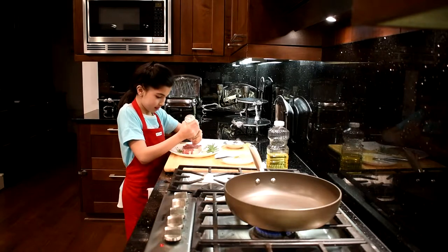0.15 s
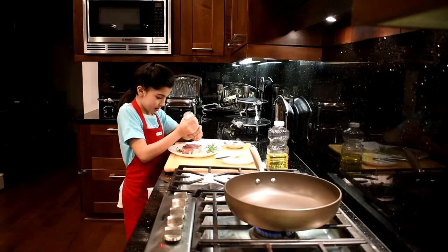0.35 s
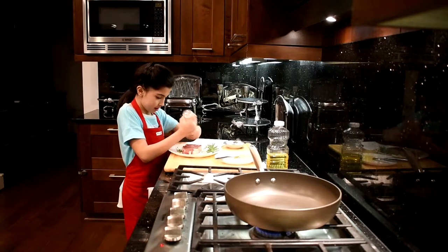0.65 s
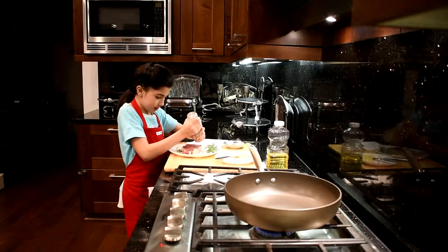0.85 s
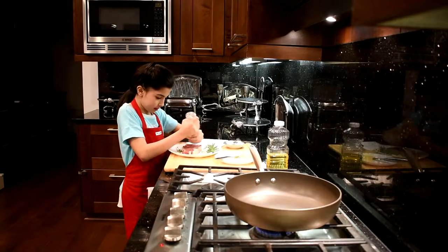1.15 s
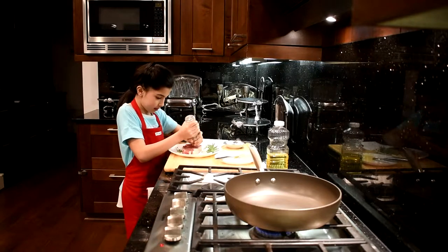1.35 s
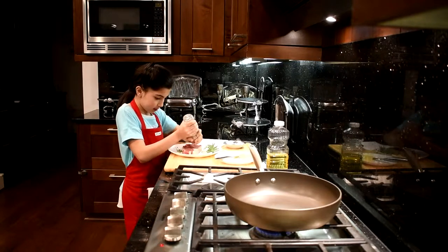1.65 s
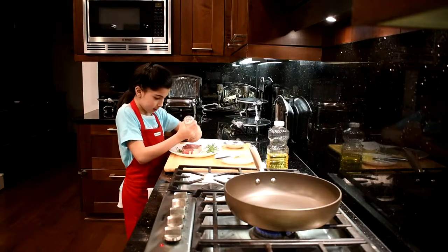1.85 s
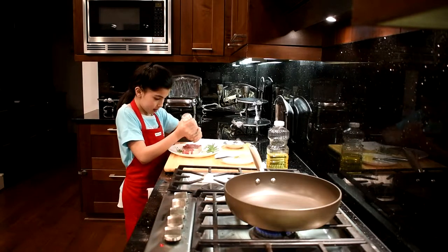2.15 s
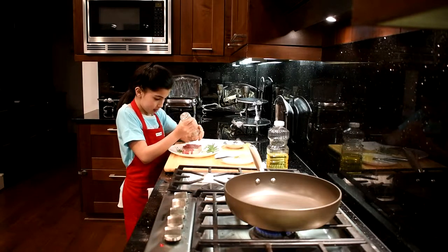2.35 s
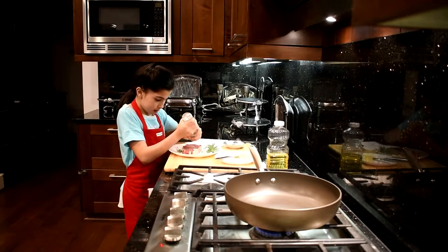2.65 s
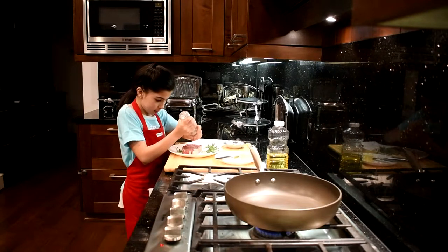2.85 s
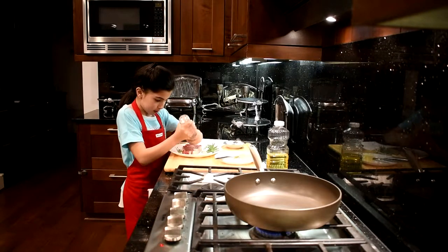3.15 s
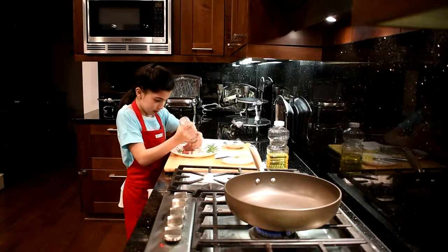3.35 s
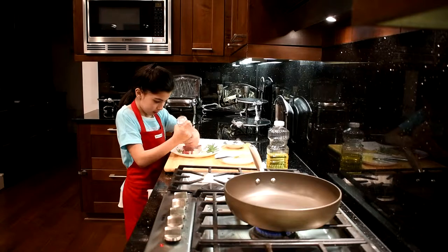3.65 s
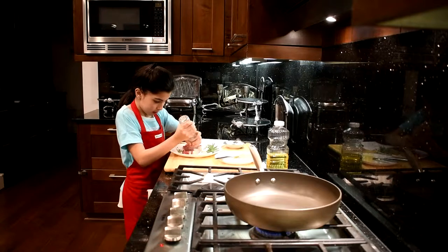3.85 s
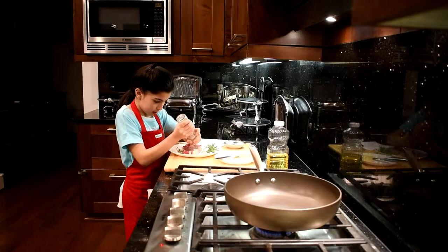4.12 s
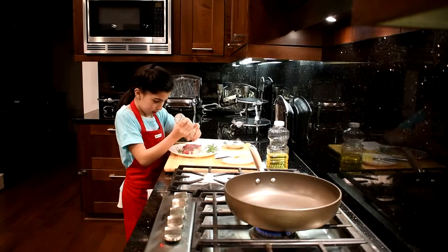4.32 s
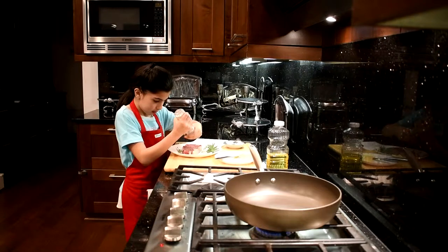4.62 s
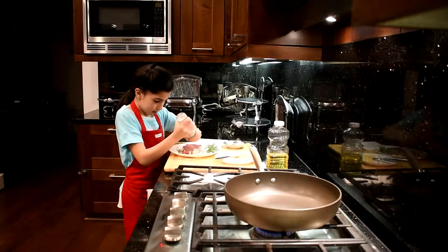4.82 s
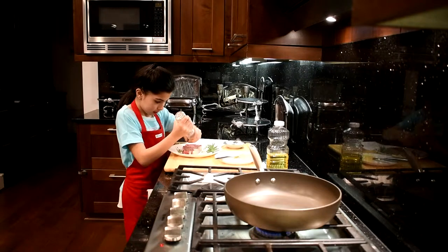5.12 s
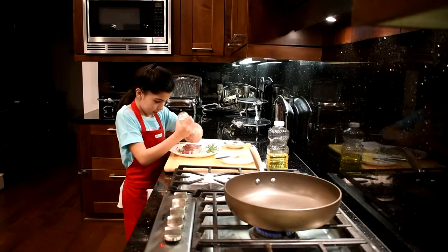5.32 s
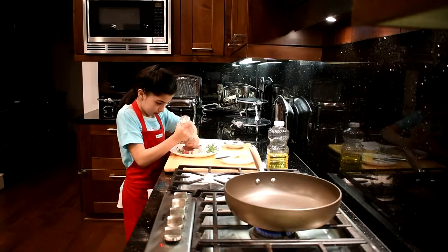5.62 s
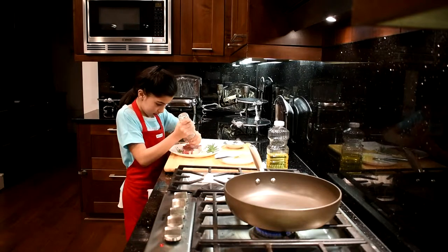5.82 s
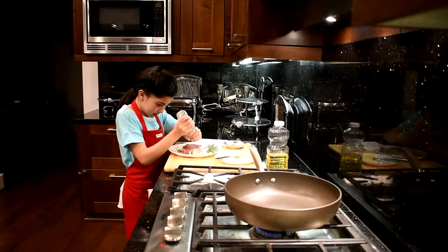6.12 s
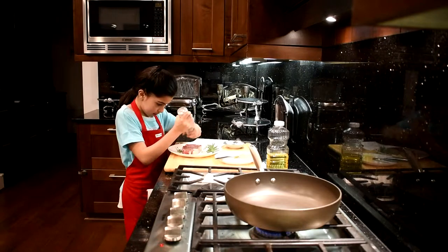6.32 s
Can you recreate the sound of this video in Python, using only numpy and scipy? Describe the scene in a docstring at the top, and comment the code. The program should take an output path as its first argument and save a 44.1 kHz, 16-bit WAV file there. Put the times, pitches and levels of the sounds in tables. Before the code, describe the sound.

In a hard-surfaced home kitchen, a salt mill crunches close to the microphone, very slightly right of centre. Dry, treble-heavy snaps of breaking crystals stand out over short rasping scrapes, brief powdery hisses and little plastic-like cap bumps. Irregular twists alternate with near-quiet gaps where a soft gas-burner rush and faint hum remain. The loudest cracks clip with a small low thump, and echoes fade around.

```python
"""A hand mill grinds coarse salt over a plate in a hard-walled kitchen: each scrape is fine random grain noise
through the grit, cap and body resonances, and crystals crack in short noise strikes, some with a run of pieces.
The cap knocks and powder puffs hiss; echoes and a decaying noise tail form the room.
Behind lie a burner-like noise rush and a faint hum; the overloaded stereo recorder adds low thumps, clips loud
peaks and cuts the top."""
import sys
import numpy as np
from scipy import signal
from scipy.fft import rfft, irfft
from scipy.io import wavfile

SR = 44100
rng = np.random.default_rng(int(sys.argv[2]) if len(sys.argv) > 2 else 0)


def persist_wave(psi):
    """Save psi, clipped to +-1, as 16-bit WAV."""
    counts = np.round(np.clip(psi, -1, 1) * 32767).astype(np.int16)
    wavfile.write(sys.argv[1], SR, np.atleast_2d(counts).T)


N = 285768
TIME_S = np.arange(N) / SR

# Kitchen air noise. Each row: frequency in Hz, relative density in dB per Hz.
AIR_SPECTRUM = [(15, -40), (25, -17), (92, -1), (200, -6), (335, 4.5), (427, -11), (476, -4.5),
                (2110, -16.5), (2990, -16), (3620, -18), (7310, -16), (9070, -39.5), (10400, -21.5),
                (14800, -20.5), (16000, -36)]
# Left-right likeness of the air noise. Each row: frequency in Hz, correlation from -1 to 1.
AIR_CORRELATION = [(40, 0.67), (80, 0.879), (140, -0.0235), (300, -0.66484), (600, -0.46), (2000, -0.6911),
                   (12000, -0.056)]
# Appliance hum. Each row: frequency in Hz, rms level in dB.
HUM_TONES = [(84, -83), (107.7, -72), (339, -70.5)]
# Room decay. Each row: frequency in Hz, time to fall 60 dB in seconds.
ROOM_T60 = [(300, .5), (1300, 1.3253), (3000, 1.0), (6000, 0.9791), (9000, 0.5), (15000, 0.631)]
# Room tail. Each row: frequency in Hz, level in dB re the direct sound, before scatter is added.
ROOM_LEVELS = [(300, -1), (1300, -3.5), (3000, -3.5), (6000, -7), (9000, -7), (15000, -12.5)]
# First echoes from counter and tiles. Each row: delay in seconds, level in dB re the direct sound.
FIRST_ECHOES = [(.0069, -25), (0.0107, -9.5)]

# Resonances. Each row: frequency in Hz, width in Hz, relative level in dB.
BURR_RESONANCES = [(4938.3, 1554.3, -6.5), (7014.5, 998.2, 2.5), (7793.8, 417, 6.5), (9076.1, 1190.3, 2.5)]
SPLINTER_RESONANCES = [(10440, 3200, 5.5), (13828, 1100, 1), (15930, 1000, -0.5)]
BODY_RESONANCES = [(318.19, 33.59, -1.5), (543.31, 119.35, -11), (694, 1000, -21.5)]  # hollow body of the mill, columns as above
GRIT_RESONANCES = [(4359, 910, -14), (5829.4, 676, -3.5), (6398, 1218.3, -3), (8254.5, 1240.7, 0.5),
                   (9247, 1013.8, 2.5), (11928, 5400, -13), (15000, 2900, -14.5)]
JAR_RESONANCES = [(1306.6, 204.87, -2.5), (1870.1, 301.88, 1.5), (2425.2, 650.3, 1), (3075, 350.2, 6),
                  (3978.1, 736.2, -1)]
CAP_RESONANCES = [(967.25, 64, -5), (1310, 217.1, 7.5), (1959.1, 470, -7), (2660.4, 560, -4),
                  (3054.6, 856.8, 6.5), (3909.5, 830, -8), (4953, 530, -1)]
# Least damped region under the hands. Each row: time in seconds, frequency in Hz.
FREE_REGION = [(.3, 3978), (.62, 2868), (1.05, 1379), (1.48, 2332), (2.55, 2494), (2.68, 2906),
               (2.82, 1900), (3.5, 3111), (4.24, 2473), (4.78, 2280), (5.86, 2450), (6.23, 2247)]

# Powder puffs. Each row: centre in seconds, Gaussian sigma in seconds, level in dB before level_db.
POWDER_PUFFS = [(0.804, 0.04095, -52), (1.117, 0.02184, -55.5), (1.192, 0.01915, -48.5),
                (3.144, 0.02568, -48.5)]
# Low thumps of the overloaded recorder under the loudest cracks.
# Each row: start in seconds, peak level in dB before the high-pass.
OVERLOAD_THUMPS = [(2.547, -34), (2.831, -27), (4.7513, -26.5), (4.778, -37), (5.862, -28.5)]
# Cap bumping the jar. Each row: start in seconds, cap level in dB, hollow body level in dB.
CAP_KNOCKS = [(0.6165, -29.5, -36), (.626, -46, -35.5), (1.0518, -35, -41.5), (1.479, -46.5, -48),
              (2.025, -47, -54.5), (2.232, -42.5, -52.5), (2.447, -47, -48.5), (3.145, -56, -46.5),
              (3.508, -36, -46), (3.619, -43.5, -37.5), (4.2, -43, -58.5), (4.243, -40.5, -44),
              (4.978, -41, -52.5), (5.6996, -42, -49.5), (6.226, -29.5, -48.5)]
# Burrs biting into grit. Each row: start in seconds, time to release in seconds,
# grit level in dB before grit_db, cap rasp in dB re grit before rasp_db.
GRIT_SCRAPES = [(0.208, 0.0212, -49.5, -9), (.576, .056, -29.5, -9), (0.689, 0.09998, -32, -11.5),
                (0.979, 0.0588, -38, -9), (1.078, 0.0566, -42.5, -18.5), (1.141, 0.06511, -39.5, -7),
                (1.408, 0.01645, -50, -3), (1.759, 0.1115, -52.5, -21), (2.004, 0.1156, -50.5, -20),
                (2.451, 0.03498, -47.5, -13.5), (2.501, 0.01976, -43.5, -5), (3.082, 0.09144, -33.5, -12),
                (3.24, 0.03173, -37, -11), (3.363, 0.02549, -44.5, -8), (3.563, 0.06734, -34, -11),
                (3.72, 0.08569, -36.5, -9), (4.195, .055, -59, 3.5), (4.382, 0.0405, -58, -21),
                (5.319, 0.14817, -52, -4.5), (5.511, 0.020423, -42.5, -4.5), (6.189, 0.025833, -27, -16),
                (6.216, 0.024521, -19.5, -27)]
# Crystals cracking. Each row: start in seconds, snap level in dB, jar ringing in dB re snap, splinters in
# dB re snap (each before its own offset in cracks), time for the pieces to lose PIECE_FADE_DB in seconds (0: none).
CRYSTAL_CRACKS = [(.056, -41.5, -5, -18, 0), (.141, -39, -5.5, -13, 0.001206), (.279, -12, -6, -6, 0),
                  (0.2851, -13, -13.5, -19.5, 0.000028), (0.3069, -22, -3, -15.5, 0.00216),
                  (.551, -37, -7, -6.5, 0), (0.5788, -33.5, -3, -13.5, 0.002092),
                  (1.317, -39.5, -5, -15.5, 0), (1.4797, -34.5, -4, -19, 0.00962),
                  (1.726, -41.5, -5, -9, 0.000746), (2.006, -43, -8, -15, 0.000567),
                  (2.2324, -35.5, -16.5, -16.5, 0), (2.447, -35.5, -19, -1, 0.003941),
                  (2.548, -5, -12.5, -9.5, 0.010947), (2.5816, -13, -20, -20, 0.000035),
                  (2.61, -12.5, -16, -4, 0.000479), (2.6667, -14, -15, -12, 0.021),
                  (2.825, -24, -7.5, -12.5, 0.000209), (2.8306, -8, -13.5, -27.5, 0.0061),
                  (3.08, -34, -7.5, -13, 0.00312), (3.1456, -29.5, -12.5, -7.5, 0.000016),
                  (3.508, -38, -20.5, -10.5, 0), (3.9111, -21, -16, -20.5, 0),
                  (3.9706, -37, -9.5, -11.5, 0), (4.021, -22, -13.5, -7, 0.00005),
                  (4.2441, -37, -7, -4.5, 0), (4.3196, -43.5, -12, -14.5, 0),
                  (4.678, -44.5, -10.5, -19.5, 0.00037), (4.7516, -6, -19.5, -9.5, 0.00779),
                  (4.7785, -4.5, -16, -12, .026), (4.8021, -8, -17, -8, 0),
                  (5.3265, -39.5, -10.5, -22.5, 0.000718), (5.4431, -40.5, -9, -16, 0.000299),
                  (5.475, -38, -9, -17.5, 0.001378), (5.5594, -15.5, -14, -11, 0),
                  (5.7101, -37, -6.5, -7, 0.000023), (5.7694, -29, -13.5, -10, 0.00023),
                  (5.8541, -5, -10, -5, .028), (5.9052, -7, -21, -9, .007), (6.213, -15.5, -14, -2, 0),
                  (6.2254, -12.5, -22, 2, 0.01379)]

AIR_DB, CUTOFF_HZ = -52, 15750
BITE_S, SAG_DB_PER_S, RELEASE_S = 0.01391, 22.5, 0.02403
BODY_RE_RASP_DB = -6.5
PIECE_GAP_S, PIECE_GAP_LOG_SPREAD = .006, .12
PIECE_RE_SNAP_DB, PIECE_FADE_DB = -4, 8.5


def from_db(db):
    """Decibels to gain."""
    return 10 ** (np.asarray(db) / 20)


def rms_one(x):
    """Scale to unit rms."""
    return x / np.sqrt(np.mean(x ** 2) + 1e-20)


def at_hz(points, hz):
    """Read a table on a log-frequency axis."""
    table_hz, values = np.array(points).T[:2]
    return np.interp(np.log(hz), np.log(table_hz), values)


def add(track, start_s, sound):
    """Mix a sound in at a given time."""
    at = round(start_s * SR)
    track[:, at:at + sound.shape[-1]] += sound[..., :N - at]


def pair(mid, side, correlation):
    """Left and right with a given correlation."""
    correlation = np.clip(correlation, -1, 1)
    common = np.sqrt((1 + correlation) / 2) * mid
    return common + np.sqrt((1 - correlation) / 2) * np.array([side, -side])


def resonate(x, modes):
    """Parallel two-pole resonances with alternating signs."""
    out = 0
    for k, (hz, width_hz, db) in enumerate(modes):
        radius = np.exp(-np.pi * width_hz / SR)
        gain = (-1) ** k * from_db(db) * (1 - radius ** 2) / 2
        poles = [1, -2 * radius * np.cos(2 * np.pi * hz / SR), radius ** 2]
        out = out + signal.lfilter([gain, 0, -gain], poles, x + 1e-18)
    return out


def noise_bands(size):
    """Half-octave bands of two-channel noise, as (centre Hz, band)."""
    edges_hz = np.geomspace(22, 17500, 21)
    white = rng.standard_normal((2, 2, size))
    for k, (low, high) in enumerate(zip(edges_hz, edges_hz[1:])):
        bandpass = signal.butter(2, [low, high], "band", fs=SR, output="sos")
        yield np.sqrt(low * high), signal.sosfilt(bandpass, white[k % 2])


def air_rush():
    """Steady rush of the burner and the room: noise bands weighted in level and stereo correlation."""
    rush = np.zeros((2, N))
    for hz, band in noise_bands(N):
        rush += from_db(at_hz(AIR_SPECTRUM, hz)) * pair(*band, at_hz(AIR_CORRELATION, hz))
    return from_db(AIR_DB) * rms_one(rush)


def appliance_hum():
    """Faint steady sines at random phases."""
    hum = np.zeros(N)
    for hz, db in HUM_TONES:
        hum += from_db(db) * np.sqrt(2) * np.sin(2 * np.pi * (hz * TIME_S + rng.random()))
    return hum


def kitchen(x, scatter_db, scatter_s, build_s, size=44100):
    """Two discrete echoes, quick scatter from things on the counter, then the long tail of the room."""
    age_s, response = np.arange(size) / SR, np.zeros((2, size))
    onset = 1 - np.exp(-(age_s / build_s) ** 2)
    scatter = from_db(scatter_db) * rms_one(onset * np.exp(-age_s / scatter_s))
    for hz, band in noise_bands(size):
        tail = rms_one(onset * from_db(-60 * age_s / at_hz(ROOM_T60, hz)))
        envelope = np.hypot(tail, scatter) / np.sqrt(size)
        response += band * from_db(at_hz(ROOM_LEVELS, hz)) * envelope
    for delay_s, db in FIRST_ECHOES:
        response[:, round(delay_s * SR)] += from_db(db)
    return signal.fftconvolve(x, response, axes=1)[:, :N]


def overload_thumps(rise_s, size=2048):
    """The overloaded recorder gives a low thump: one short high-passed pulse, the same in both channels."""
    out, age = np.zeros((2, N)), np.arange(size) / SR / rise_s
    for start_s, db in OVERLOAD_THUMPS:
        add(out, start_s, from_db(db) * age * np.exp(1 - age))
    highpass = signal.butter(2, 22, "high", fs=SR, output="sos")
    return signal.sosfilt(highpass, out + 1e-18)


def grains(per_s, spread_db, grain_s, correlation):
    """Small grains of uneven size give way at random, each in a tiny decaying noise burst."""
    sizes = from_db(spread_db * np.minimum(rng.exponential(1, N), 3.5))
    born = rng.random(N) < per_s / SR
    decay = np.exp(-1 / (grain_s * SR))
    energy = signal.lfilter([1], [1, -decay], born * sizes ** 2 + 1e-18)
    return np.sqrt(energy) * pair(*rng.standard_normal((2, N)), correlation)


def powder(level_db, grit_db):
    """Puffs of the finest salt stream from the burrs: dense grains through broad treble resonances."""
    flow = np.zeros(N)
    for centre_s, sigma_s, db in POWDER_PUFFS:
        flow += from_db(db + level_db) * np.exp(-((TIME_S - centre_s) / sigma_s) ** 2 / 2)
    dust = grains(per_s=3400, spread_db=6.5, grain_s=0.000594, correlation=0.1078)
    hiss = rms_one(resonate(dust, [(14303, 4530, 0)]))
    grit = rms_one(resonate(dust, [(6675, 3987, 0)]))
    return flow * (hiss + from_db(grit_db) * grit)


def gripped(modes, time_s, grip_db):
    """The hands damp the modes by grip_db per octave away from the free region."""
    free_hz = np.interp(time_s, *np.transpose(FREE_REGION))
    return [(hz, width_hz, db - grip_db * abs(np.log2(hz / free_hz))) for hz, width_hz, db in modes]


def burst(force):
    """Noise under a short force curve, evened over frequency and shaped by the force again."""
    spectrum = rfft(force * rng.standard_normal(force.shape))
    return force * irfft(spectrum / (np.abs(spectrum) + 1e-9))


def strike(force, parts, correlation):
    """One blow rings each (modes, dB) part; levels are rms referred to three milliseconds."""
    push = pair(burst(force), burst(force), correlation)
    share = np.sqrt(.003 * SR / len(force))
    return sum(from_db(db) * share * rms_one(resonate(push, modes)) for modes, db in parts)


def knocks(contact_s, grit_db, grip_db, size=4096):
    """The loose cap takes up its play and bumps the jar, pinching a little grit."""
    out, force = np.zeros((2, N)), np.exp(-np.arange(size) / SR / contact_s)
    for start_s, cap_db, body_db in CAP_KNOCKS:
        held_cap = gripped(CAP_RESONANCES, start_s, grip_db)
        parts = [(held_cap, cap_db), (BODY_RESONANCES, body_db), (GRIT_RESONANCES, cap_db + grit_db)]
        add(out, start_s, strike(force, parts, correlation=0.24))
    return out


def scrape(length_s, size=22050):
    """Pressure on the grit: quick rise, a sag as the grit wears down, and a release."""
    age_s = np.arange(size) / SR
    bite = np.minimum(age_s / BITE_S, 1)
    release = np.exp(-np.maximum(age_s - length_s, 0) / RELEASE_S)
    return bite * from_db(-SAG_DB_PER_S * age_s) * release


def grinding(grit_db, rasp_db):
    """Twisting crushes grit between the burrs; the cap rasps along and the hollow body murmurs."""
    levels = np.zeros((2, N))
    for start_s, length_s, db, cap_db in GRIT_SCRAPES:
        add(levels, start_s, from_db([[db], [db + cap_db]]) * scrape(length_s))
    grit, rasp = levels
    crush = grains(per_s=700, spread_db=2.8, grain_s=0.0006, correlation=0.1495)
    parts = [(grit, GRIT_RESONANCES, grit_db), (rasp, CAP_RESONANCES, rasp_db),
             (rasp, BODY_RESONANCES, rasp_db + BODY_RE_RASP_DB)]
    return sum(level * from_db(db) * rms_one(resonate(crush, modes)) for level, modes, db in parts)


def pieces(start_s, snap_db, run_s, count=5):
    """The first snap and any fading run of smaller, unevenly spaced ones, as (s, dB)."""
    snaps = [(start_s, snap_db)]
    gaps_s = PIECE_GAP_S * np.exp(PIECE_GAP_LOG_SPREAD * rng.standard_normal(count))
    if run_s > 0:
        for age_s in np.cumsum(gaps_s):
            fade_db = PIECE_FADE_DB * (age_s / run_s) ** 2
            snaps.append((start_s + age_s, snap_db + PIECE_RE_SNAP_DB - fade_db))
    return snaps


def cracks(fracture_s, crumble_s, crumble_db, shower_s, grip_db, snap_db, jar_db, splinter_db, body_db,
           size=1024):
    """A fracture takes a few milliseconds; pieces break in turn and fine splinters shower off."""
    out, age_s = np.zeros((2, N)), np.arange(size) / SR
    force = np.exp(-(age_s / fracture_s) ** 4) + from_db(crumble_db) * np.exp(-age_s / crumble_s)
    shower = np.exp(-age_s / shower_s)
    for start_s, first_db, jar, splinter, run_s in CRYSTAL_CRACKS:
        held_jar = gripped(JAR_RESONANCES, start_s, grip_db)
        for piece_s, db in pieces(start_s, first_db, run_s):
            parts = [(BURR_RESONANCES, db + snap_db), (held_jar, db + jar + jar_db),
                     (BODY_RESONANCES, db + body_db)]
            splinters = [(SPLINTER_RESONANCES, db + splinter + splinter_db)]
            add(out, piece_s, strike(force, parts, correlation=0.04))
            add(out, piece_s, strike(shower, splinters, correlation=0.12))
    return out


def scene():
    """The mill stands a little to the right; its reverberation comes from all round."""
    mill = powder(level_db=-1.0, grit_db=8.5)
    mill = mill + knocks(contact_s=0.0020925, grit_db=-4.5, grip_db=5)
    mill = mill + grinding(grit_db=-5.0, rasp_db=-5)
    mill = mill + cracks(fracture_s=0.0027248, crumble_s=0.0017, crumble_db=9.5, shower_s=0.008, grip_db=6.5,
                         snap_db=-1.5, jar_db=-2.0, splinter_db=-2.5, body_db=-36.5)
    direct = mill * from_db([[-1.1], [1.1]])
    room = kitchen(mill, scatter_db=4.0, scatter_s=0.028057, build_s=0.0016)
    return air_rush() + appliance_hum() + room + overload_thumps(rise_s=0.0005) + direct


def record(dry):
    """The right microphone port rings in the treble, peaks overload, the top is cut."""
    left, right = dry
    right = from_db(-0.9023) * right + resonate(right, [(9360.3, 608, 2.9555)])
    clipped = np.clip([left, right], -.85, .85)
    lowpass = signal.ellip(10, .1, 70, CUTOFF_HZ, fs=SR, output="sos")
    return signal.sosfilt(lowpass, clipped)


dry = scene()
out = record(dry)
persist_wave(out)
```